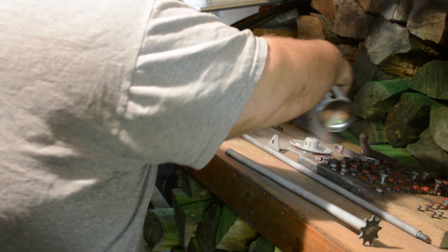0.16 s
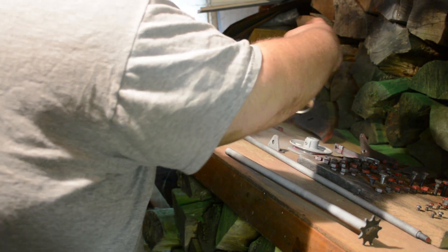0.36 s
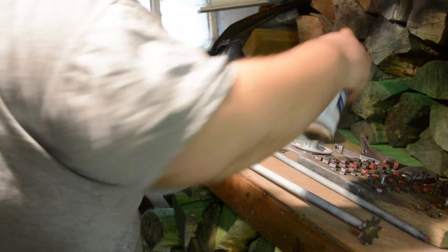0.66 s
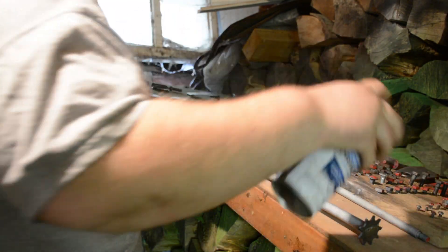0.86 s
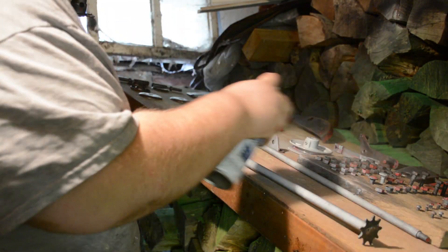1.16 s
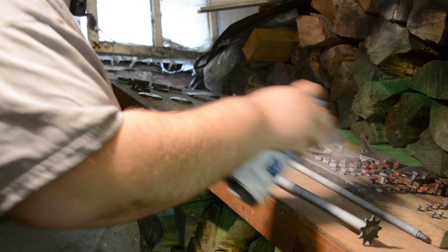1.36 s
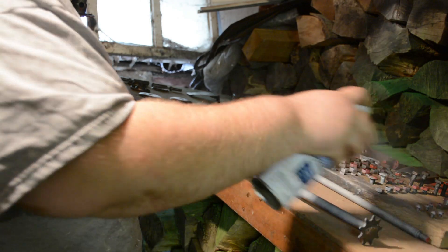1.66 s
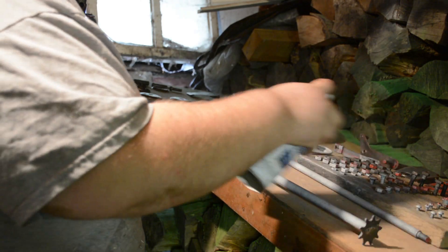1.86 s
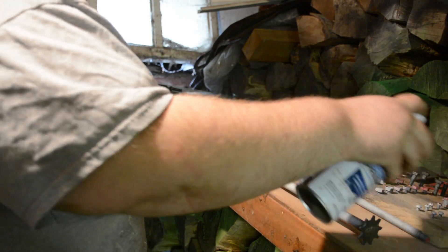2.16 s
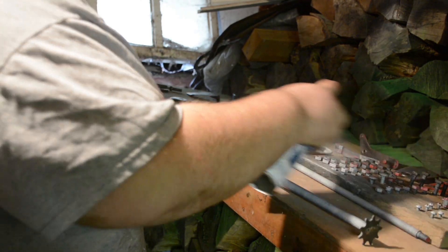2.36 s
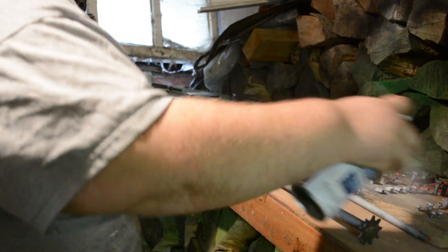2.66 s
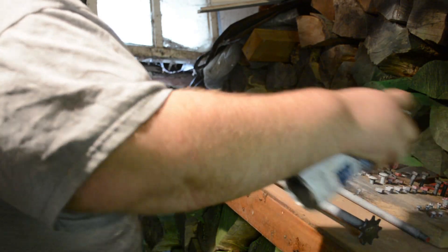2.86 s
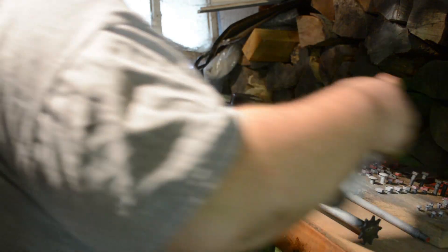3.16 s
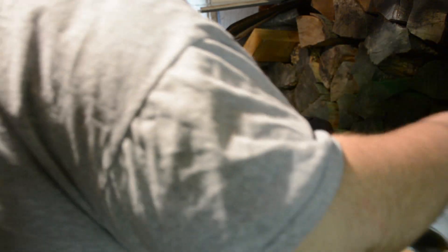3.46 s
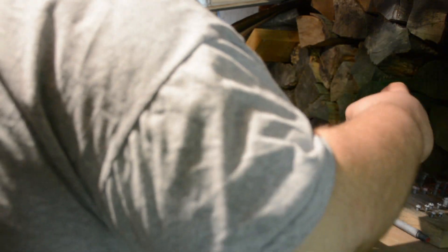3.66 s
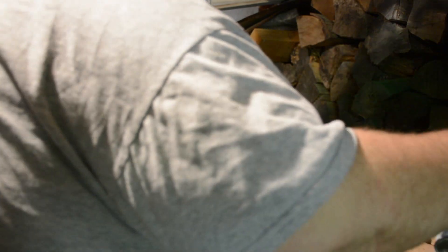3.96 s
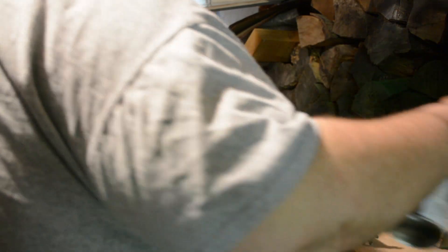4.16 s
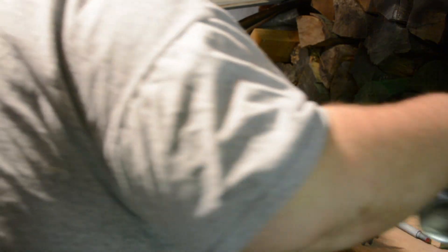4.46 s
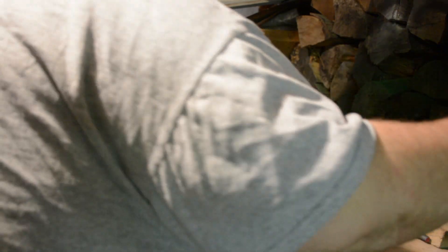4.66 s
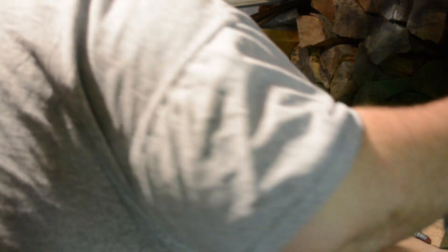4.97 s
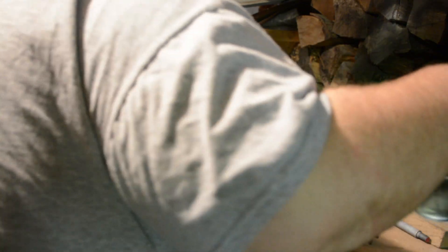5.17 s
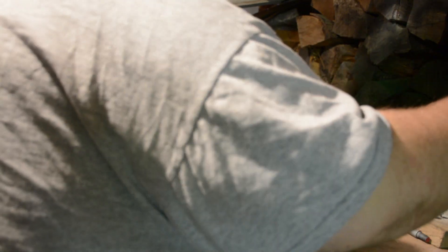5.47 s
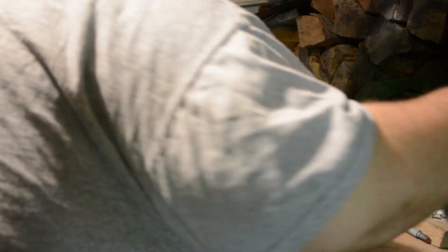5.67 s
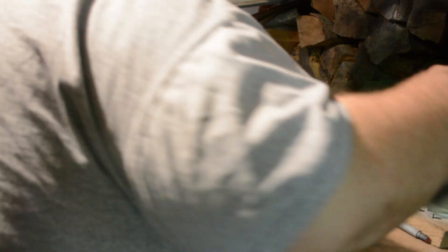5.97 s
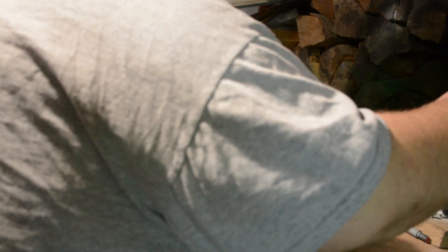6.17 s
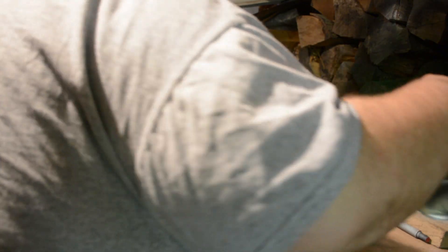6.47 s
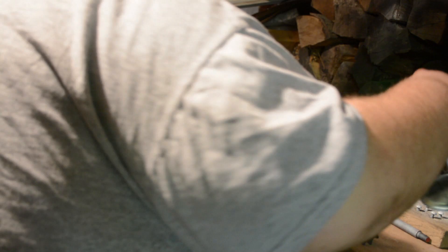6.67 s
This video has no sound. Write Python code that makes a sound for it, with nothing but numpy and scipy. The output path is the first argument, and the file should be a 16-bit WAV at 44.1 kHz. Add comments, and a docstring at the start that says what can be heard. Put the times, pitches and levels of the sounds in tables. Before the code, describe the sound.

A spray paint can gives one short, bright hiss at about 0.1 seconds, then pauses. From 1 second it sprays in quick, regular bursts, about three a second, each lasting under a quarter of a second, until the last ends near 6.9 seconds. There are nineteen in all. Each opens and shuts crisply, with a slight sputter and a slightly different tone; the one at 4.5 seconds is a little longer. The can gives faint, scattered metallic ticks as it swings. At about 2.75 and 3 seconds come two quick double knocks on a wooden workbench, with sharper clicks from the can and a small clatter. A shirt sleeve rustles softly as the arm moves, under the spray. The setting is a small, quiet workroom with a faint low hum and very short reflections, heard in stereo from close behind the painter.

```python
"""Spray painting at a workbench

Nineteen short bursts leave a paint can over metal parts in a small workroom. At each press the valve
leaks a thin hiss, then opens into a turbulent jet that excites the nozzle's resonance; reflections from
bench and walls colour every burst differently. The can ticks between presses, something knocks on the
bench, and a sleeve rustles over the quiet room. Two close microphones stand just behind the painter."""
import sys
import numpy as np
from scipy import signal
from scipy.fft import rfft, irfft
from scipy.io import wavfile

SR = 44100
rng = np.random.default_rng(int(sys.argv[2]) if len(sys.argv) > 2 else 0)


def wrap_up_sound(samples):
    """Save the sound to the file named by the first command line argument, as 16-bit audio."""
    columns = np.atleast_2d(samples).T
    # keep every value between -1 and 1, then stretch to whole-number steps
    tamed = np.clip(columns, -1, 1)
    steps = np.round(tamed * 32767).astype(np.int16)
    wavfile.write(sys.argv[1], SR, steps)


N = 300762
TIME = np.arange(N) / SR
HZ = np.maximum(np.arange(N // 2 + 1) * SR / N, 1)
TOP_HZ, WALLS_DB = 15750, -6  # upper band limit; reverberation relative to the direct sound

# Levels in the tables are relative. Spectrum of the room's background noise: f/Hz, density/dB
ROOM_SPECTRUM = [(20, -38), (40, -44), (65, -5), (100, -2.5), (150, -1), (230, -7), (300, 1.5), (400, -5.5),
                 (480, -4), (600, -6.5), (850, -9.5), (1600, -20), (3600, -37), (15500, -47)]
# Faint wavering tones in the room: f/Hz, level/dB
HUM_TONES = [(98, -72), (359, -68), (479, -72)]
# Friction spectrum of the sleeve: f/Hz, density/dB
CLOTH_SPECTRUM = [(300, -2), (900, 12), (1800, 5), (2800, 6), (4000, -3), (8000, -14), (15000, -23)]
# Rustles, one for each wide move of the arm: centre t/s, duration/s, level/dB
ARM_MOVES = [(.05, 0.44, -53.5), (1.7, 0.72, -51.5), (2.56, 0.35, -46.5), (3.2, 0.84, -51),
             (4.1, 0.12, -51.5), (5.25, 0.75, -52), (5.75, 0.64, -58)]
# Faint modes of the swinging can: f/Hz, bandwidth/Hz, level/dB
SWING_MODES = [(864, 63, -13), (1374, 25, -10.5), (1868, 120, -11.5)]
# Ticks of the can as it is swung: t/s, level/dB
CAN_TICKS = [(.443, -51), (1.284, -47), (1.564, -52), (1.897, -52), (1.912, -52), (2.508, -54),
             (2.563, -45.5), (2.755, -39.5), (2.777, -38.5), (3, -33.5), (3.033, -39.5), (3.138, -50),
             (3.782, -52), (4.389, -51), (5.866, -51), (5.925, -60)]
# Modes of the can excited by a tick: f/Hz, bandwidth/Hz, level/dB
CAN_MODES = [(1880, 520, 6), (2380, 330, -6), (3370, 390, 7), (4900, 1200, -5), (8000, 4000, -20)]
# Blows on the bench: t/s, peak level/dB, centre of excitation f/Hz
BENCH_KNOCKS = [(2.748, -25, 696), (2.771, -31, 605), (2.982, -22.5, 1100), (3.023, -25, 337)]
# Modes of the bench: f/Hz, bandwidth/Hz, level/dB
BENCH_MODES = [(265, 87, -0.5), (680, 130, 5), (1330, 260, 0)]
# Spectrum of the open jet: f/Hz, density/dB
JET_SPECTRUM = [(150, -30), (500, -16), (850, -11.5), (1200, -5), (1600, -7.5), (2100, -3.5), (3100, -6),
                (3700, -3.5), (4500, -1.75), (6400, -2.5), (9500, 1.5), (12000, 2.5), (15500, 6)]
# Resonances of cap and can in the jet: f/Hz, bandwidth/Hz, level/dB
CAP_MODES = [(5910, 370, 3), (7050, 410, 3), (8630, 400, -1), (5030, 380, -0.5)]
# Colour of the jet as the can moves along the bench: t/s, treble gain/dB, low rush gain/dB
JET_BALANCE = [(0, 2.8, -4), (1.3, 1.5, -3), (2.5, 2, -0.5), (3.2, -0.5, -3.5), (4.2, 0, -2.5),
               (5.2, -0.4, -5.5), (6.8, 0, -3.5)]
# Presses: opening t/s, closing t/s, seep before opening/s, level/dB, ring on press/dB, ring on lift/dB
PRESSES = [(0.111, .306, .013, -35, 5, 11.5), (.993, 1.193, 0.013, -31.5, 0.5, -13),
           (1.341, 1.523, 0.017, -31, 0, 1), (1.656, 1.822, 0.0061, -31, 1, -9),
           (1.987, 2.159, 0.011, -31.5, 3.5, 8.5), (2.3, 2.438, 0.015, -33, 4.5, -3),
           (2.593, 2.743, 0.019, -31.5, 1, 4), (2.911, 3.057, .012, -30, 0, 4),
           (3.24, 3.404, 0.021, -30.5, 4.5, 5.5), (3.563, 3.729, 0.013, -30.5, 1.5, -3),
           (3.896, 4.027, .021, -33, 5, 8), (4.171, 4.334, 0.017, -30.5, 5, 6),
           (4.504, 4.746, 0.012, -31.5, 7, 2), (4.941, 5.126, 0.026, -30, 3, -29),
           (5.293, 5.469, 0.012, -30.3, 4, -20), (5.626, 5.82, 0.014, -31, 3, 5),
           (6.005, 6.175, 0.024, -31.5, 3, -4), (6.342, 6.523, 0.014, -31.5, 2, 4),
           (6.696, 6.87, 0.0095, -32, -3.5, 0)]
# Relation between the two microphones: f/Hz, coherence (0-1), phase lead of the left/rad
MIC_COHERENCE = [(100, 1, 0.046), (1100, 1, 0.21), (2140, 1, 0.25), (2770, .98, -0.054), (3620, 1, 0),
                 (6000, 0.9, 0.079), (8000, 0.8, -0.51), (10900, 0.65, -.45), (15000, 0.6, -1.15)]
# Level difference between the microphones: f/Hz, left minus right/dB
MIC_BALANCE = [(60, 1), (110, -0.5), (200, -1), (380, -0.5), (700, -0.5), (1290, -0.5), (2380, -0.5),
               (4400, -0.5), (8120, -0.5), (15000, -1.5)]
# Self-noise of each microphone: f/Hz, density/dB
MIC_NOISE = [(20, -24), (90, -33), (400, -3), (900, 0.5), (2000, -1.5), (5000, -3), (15500, -7)]


def undb(db):
    """Amplitude ratio of a level in decibels."""
    return 10 ** (np.asarray(db) / 20)


def contour(points, column=1):
    """Interpolation of one table column on a logarithmic frequency axis."""
    rows = np.array(points)
    return np.interp(np.log(HZ), np.log(rows[:, 0]), rows[:, column])


def resonance(hz, width_hz):
    """Complex response of a damped oscillator, unity at its centre."""
    return 1 / (1 + 1j * (HZ / hz - hz / HZ) * hz / width_hz)


def modal_gain(modes):
    """Incoherent modes add in power."""
    return np.sqrt(sum(np.abs(undb(db) * resonance(hz, width)) ** 2 for hz, width, db in modes))


def shape(x, gain):
    """Linear filtering multiplies the spectrum by a gain."""
    return irfft(rfft(x) * gain, N)


def noise(gain):
    """Two independent coloured noises of unit rms: what the microphones share and what they do not."""
    x = shape(rng.standard_normal((2, N)), gain)
    return x / np.sqrt(np.mean(x ** 2))


def drift(cutoff_hz):
    """Low-pass noise gives a random fluctuation with a spread near 1."""
    return noise(1 / (1 + (HZ / cutoff_hz) ** 4))[0]


def decay(start_s, t60_s, rise_s=0.00081):
    """A struck, damped body: amplitude rises fast and falls exponentially."""
    age = np.maximum(TIME - start_s, 0)
    return (1 - np.exp(-age / rise_s)) * np.exp(-np.minimum(np.log(1000) * age / t60_s, 30))


def echoes(x, bench_db=-9, bench_s=0.0042, t60_s=0.18, treble_t60_s=0.08, damping_hz=5630):
    """Early reflections off the bench, then a diffuse tail from walls that absorb treble sooner."""
    age = np.arange(SR // 4) / SR
    bench, walls = rng.standard_normal((2, len(age))) * (age > .0005)
    bench = bench * np.exp(-age / bench_s)
    dull = signal.lfilter(*signal.butter(1, damping_hz, fs=SR), walls)
    treble = (walls - dull) * np.exp(-np.log(1000) * age / treble_t60_s)
    walls = dull * np.exp(-np.log(1000) * age / t60_s) + treble
    response = undb(bench_db) * bench / np.linalg.norm(bench)
    response += undb(WALLS_DB) * walls / np.linalg.norm(walls)
    return signal.fftconvolve(x, response[None], axes=1)[:, :x.shape[1]]


def room_tone(air_db=-58.5, hum_width_hz=9):
    """Broadband noise gives a soft rumble and hiss; narrow bands of noise are heard as wavering tones."""
    hum = sum(undb(db) * noise(resonance(hz, hum_width_hz) ** 2) for hz, db in HUM_TONES)
    return noise(undb(contour(ROOM_SPECTRUM)) * (HZ < TOP_HZ)) * undb(air_db + .5 * drift(8.2)) + hum


def sleeve(cloth_db=-3.5, grain_db=1.5, metal_db=-2, rest_db=-59):
    """Uneven cloth friction and the can's faint modes swell together with each move of the arm."""
    power = sum((undb(db) * np.exp(-2 * ((TIME - s) / length) ** 2)) ** 2 for s, length, db in ARM_MOVES)
    cloth = noise(undb(contour(CLOTH_SPECTRUM))) * undb(cloth_db + grain_db * drift(69))
    metal = sum(undb(metal_db + db) * noise(resonance(hz, width) ** 2) for hz, width, db in SWING_MODES)
    return (cloth + metal) * np.sqrt(undb(rest_db) ** 2 + power)


def can_ticks(gain_db=3.5, t60_s=0.1):
    """Small impacts excite the broad, quickly damped modes of the can."""
    envelope = sum(undb(db + gain_db) * decay(s, t60_s) for s, db in CAN_TICKS)
    return noise(modal_gain(CAN_MODES)) * envelope


def bench_knocks(blow_width_hz=560, clatter_db=-13.5, clatter_t60_s=0.13):
    """Each blow is an impulse into the bench's modes; loose things on it shake on afterwards."""
    bench = sum((-1) ** k * undb(db) * resonance(hz, width)
                for k, (hz, width, db) in enumerate(BENCH_MODES))
    knocks = 0
    for s, db, hz in BENCH_KNOCKS:
        response = bench * resonance(hz, blow_width_hz) ** 2
        thud = shape(signal.unit_impulse(N, int(s * SR)), response)
        clatter = undb(clatter_db) * decay(s, clatter_t60_s) * noise(response)
        knocks += undb(db) * (thud / np.abs(thud).max() + clatter)
    return knocks


def swish(x, delay_s=0.000807, swing=0.31, reflection=0.27):
    """Comb filtering: sound interferes with its reflection off the work, delayed as the arm swings."""
    late = TIME - delay_s * np.exp(swing * drift(1.91))
    reflected = np.array([np.interp(late, TIME, row) for row in x])
    return (x + reflection * reflected) / np.hypot(1, reflection)


def moving_echoes(x, bench_db=-12, glide_s=0.14, midway_s=0.2):
    """Reflections depend on position: as the can travels, one set of echoes gives way to another."""
    age = np.arange(x.shape[1]) / SR
    angle = np.clip(.5 + (age - midway_s) / glide_s, 0, 1) * np.pi / 2
    reflected = np.cos(angle) * echoes(x, bench_db) + np.sin(angle) * echoes(x, bench_db)
    return (x + reflected) / np.sqrt(1 + undb(bench_db) ** 2 + undb(WALLS_DB) ** 2)


def jet_bands():
    """Turbulent noise, coloured by cap and can, as an upper hiss and a low rush of varying balance."""
    cap = np.sqrt(1 + modal_gain(CAP_MODES) ** 2)
    jet = swish(noise(undb(contour(JET_SPECTRUM)) * cap * (HZ < TOP_HZ)))
    treble = shape(jet, 1 / (1 + (10000 / HZ) ** 6))
    rush = shape(jet, 1 / (1 + (HZ / 1900) ** 6))
    middle = jet - treble - rush
    times, treble_db, rush_db = np.transpose(JET_BALANCE)
    hiss = middle + treble * undb(np.interp(TIME, times, treble_db))
    return hiss, rush * undb(np.interp(TIME, times, rush_db))


def valve_flow(t, on, off, seep_s, seep_db=-18, unseal_s=0.0019, opening_s=0.005, closing_s=0.0079):
    """Flow follows the aperture: the seal breaks and seeps, then the valve slides open and shuts."""
    unsealed = np.clip((t - on + seep_s) / unseal_s, 0, 1)
    travel = 1 / (1 + np.exp((on - t) / opening_s))
    return unsealed * np.hypot(undb(seep_db), travel) / (1 + np.exp((t - off + 0.0013) / closing_s))


def whistle_envelope(age, seep_s, gain_db=-19, lead_s=0.007, rise_s=0.0025, fall_s=0.021):
    """A narrow gap whistles: the tone starts just before the seep and dies as the valve opens."""
    return undb(gain_db) * np.clip((age + seep_s + lead_s) / rise_s, 0, 1) * np.clip(-age / fall_s, 0, 1)


def spray(gain_db=6.5, flutter_db=0.86, steady_db=-28.5, sputter_db=-17, release_db=-22, spit_db=-18.5):
    """A valve gates the jet, which drives the nozzle's resonance, most strongly on press and lift."""
    hiss, rush = jet_bands()
    whistle = noise(resonance(hz=13500, width_hz=1700) ** 2 * (HZ < TOP_HZ))
    nozzle = noise(resonance(hz=2870, width_hz=385) ** 2)
    low_ring = noise(resonance(hz=2594, width_hz=200) ** 2)
    flutter = undb(flutter_db * drift(47))
    out = np.zeros((2, N))
    for on, off, seep_s, db, press_db, lift_db in PRESSES:
        span = slice(max(int((on - .07) * SR), 0), int((off + .25) * SR))
        t = TIME[span]
        flow = valve_flow(t, on, off, seep_s)
        # Paint and gas sputter as the flow settles and again just before the valve shuts.
        settling = np.exp(-((t - on - .012) / .034) ** 2)
        lifting = np.exp(-((t - off + .027) / .022) ** 2)
        sputter = undb(press_db + sputter_db) * settling + undb(lift_db + release_db) * lifting
        # The square root favours the ring while the valve is part open.
        ring = (undb(press_db + steady_db) * flow + sputter * np.sqrt(flow)) * nozzle[:, span]
        spit = undb(spit_db) * settling * flow * low_ring[:, span]
        jet = flow * (hiss[:, span] + (1 + 0.63 * settling) * rush[:, span])
        leak = whistle_envelope(t - on, seep_s) * whistle[:, span]
        out[:, span] += undb(db + gain_db) * moving_echoes((jet + ring + spit + leak) * flutter[span])
    return out


def scene():
    """Sources superpose at two close microphones, coherent in the bass and less so in the treble."""
    bursts = spray()
    impacts = can_ticks() + bench_knocks()
    shared, apart = bursts + impacts + echoes(impacts) + sleeve() + room_tone()
    coherence, lead = contour(MIC_COHERENCE), contour(MIC_COHERENCE, column=2)
    mid = shape(shared, np.sqrt((1 + coherence) / 2))
    side = shape(apart, np.sqrt((1 - coherence) / 2))
    left_gain = undb(contour(MIC_BALANCE) / 2) * np.exp(1j * lead / 2)
    return np.array([shape(mid + side, left_gain), shape(mid - side, 1 / left_gain)])


def record(dry, hiss_db=-58.5, low_hz=48):
    """Each microphone adds self-noise; band limiting trims the deep bass and cuts the top steeply."""
    heard = dry + undb(hiss_db) * noise(undb(contour(MIC_NOISE)) * (HZ < TOP_HZ))
    heard = signal.sosfilt(signal.butter(2, low_hz, "high", fs=SR, output="sos"), heard)
    return signal.sosfilt(signal.ellip(10, .1, 80, TOP_HZ, fs=SR, output="sos"), heard)


dry = scene()
out = record(dry)
wrap_up_sound(out)
```